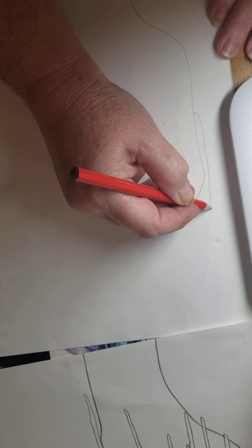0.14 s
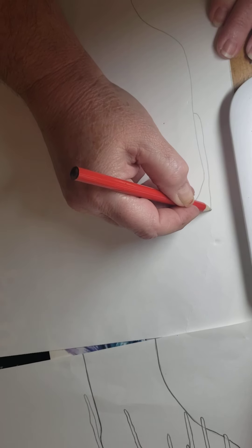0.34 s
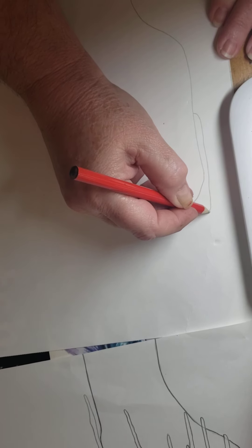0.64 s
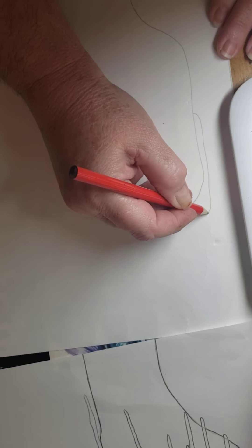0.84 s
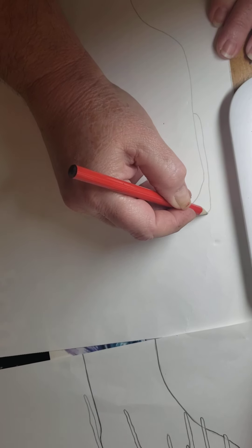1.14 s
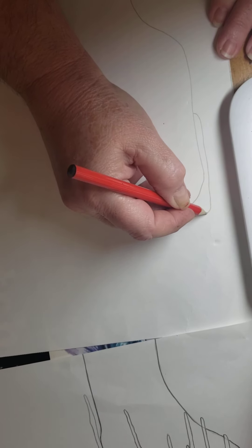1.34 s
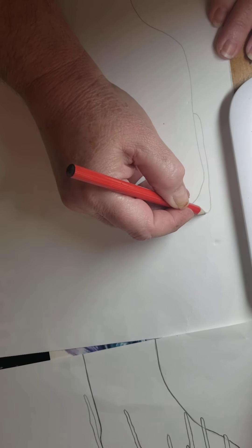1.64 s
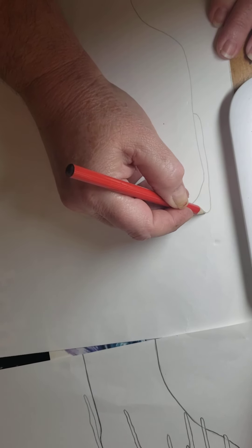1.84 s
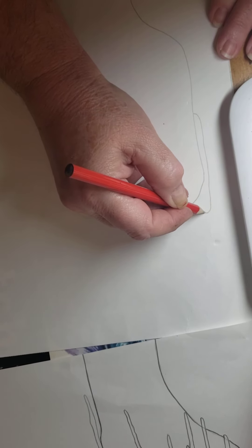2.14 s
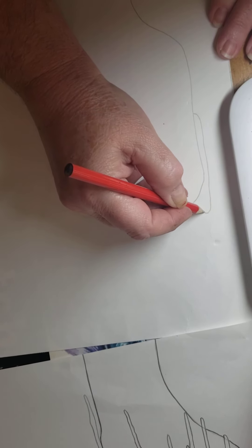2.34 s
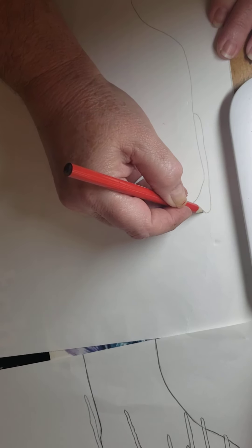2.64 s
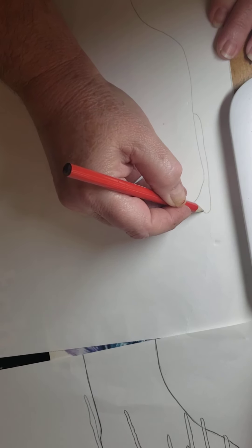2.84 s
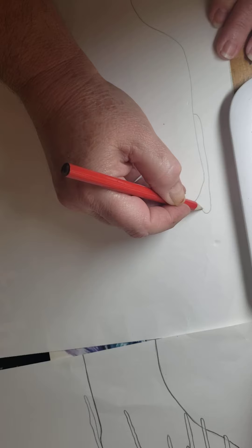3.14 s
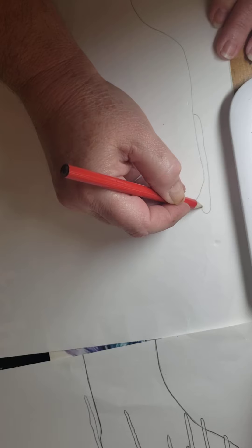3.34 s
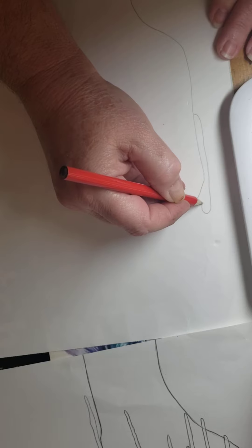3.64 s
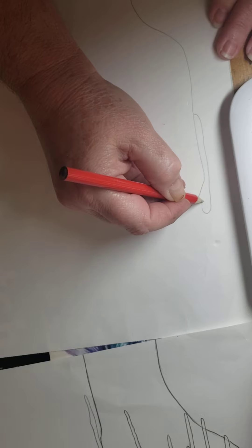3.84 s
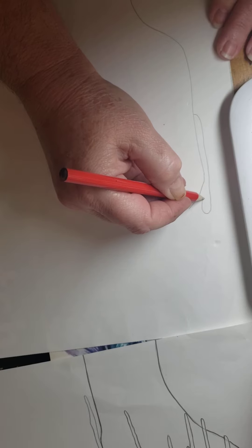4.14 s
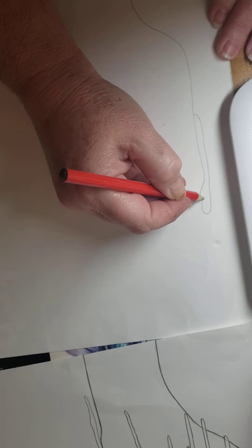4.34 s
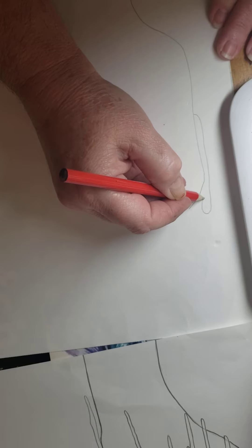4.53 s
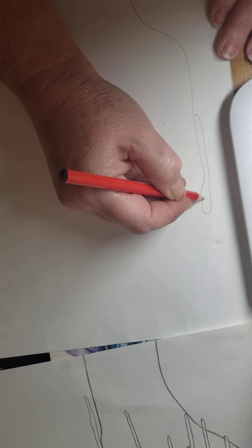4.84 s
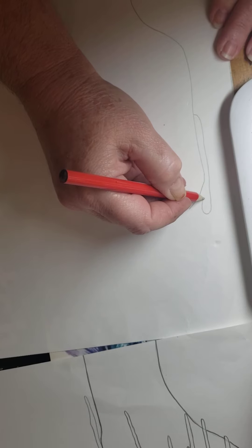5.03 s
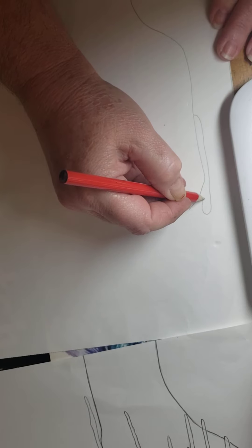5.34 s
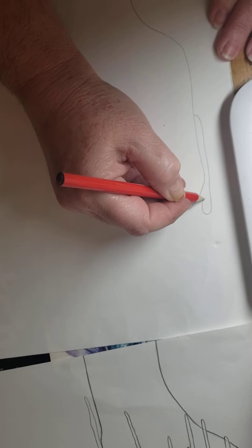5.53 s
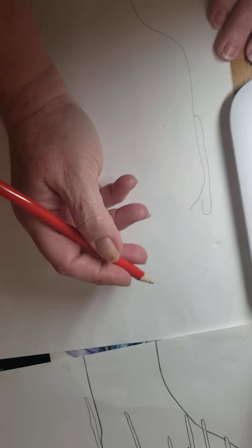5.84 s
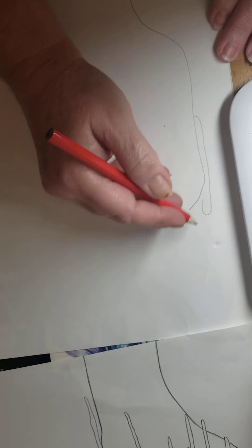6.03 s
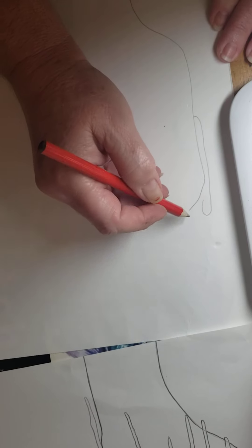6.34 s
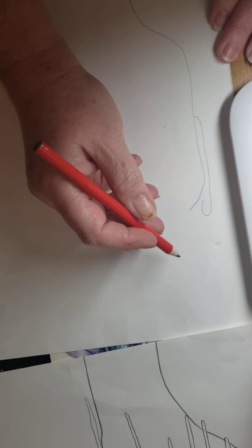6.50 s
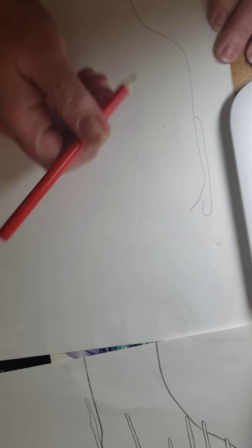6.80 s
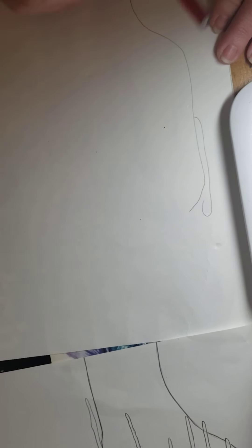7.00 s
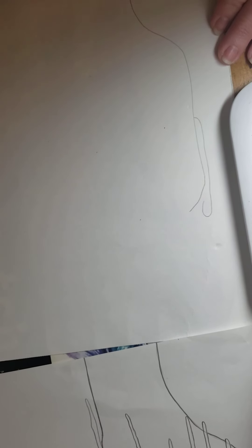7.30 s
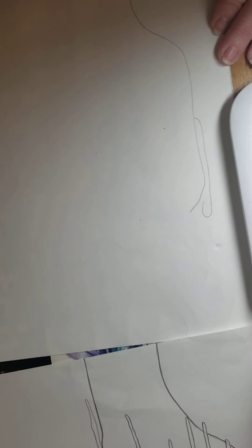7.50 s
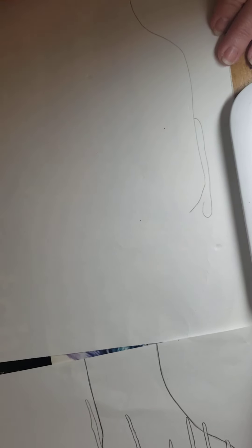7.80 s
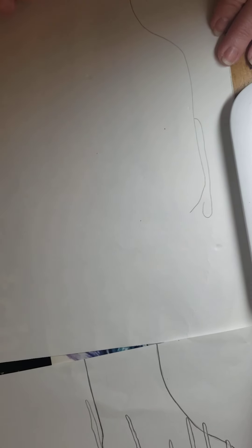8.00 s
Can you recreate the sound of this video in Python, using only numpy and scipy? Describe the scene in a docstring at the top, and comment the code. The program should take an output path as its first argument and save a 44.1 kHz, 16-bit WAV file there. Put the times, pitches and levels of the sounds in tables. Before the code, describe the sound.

A machine's low electrical hum fills a quiet indoor room, pulsing slowly at first and then faster. Beneath it lie low rumble, airy wash and faint microphone hiss. After about six seconds a hand brushes paper with two light swishes, the second stronger. Near the end a pencil touches the desk with a soft knock and small rattle, then one loud, dry, sharp click. Close stereo microphones.

```python
"""A machine hums throughout in a quiet room, over low rumble, airy wash and microphone hiss.
Its motor beats against the mains hum: the sound swells and fades, slowly at first, then faster.
After 6 s a hand slides twice over paper: two swishes of coloured noise.
At 7.5 s a pencil is laid on the desk: a soft knock, a short rattle, one sharp click and a faint bounce,
each blow a noise crack with ringing modes and a room tail, heard by two microphones a hand's width apart."""
import sys
import numpy as np
from scipy import signal
from scipy.fft import rfft, irfft
from scipy.io import wavfile

SR = 44100
rng = np.random.default_rng(int(sys.argv[2]) if len(sys.argv) > 2 else 0)


def dump(signal):
    """Clip the signal to [-1, 1] and save it as 16-bit WAV at the path in sys.argv[1]."""
    limited = np.clip(np.atleast_2d(signal).T, -1, 1)
    pcm = np.round(limited * 32767).astype(np.int16)
    wavfile.write(sys.argv[1], SR, pcm)


N = 359856
TIME, BINS = np.arange(N) / SR, np.fft.rfftfreq(N, 1 / SR)


def gain_of(db):
    """Decibels to an amplitude factor."""
    return 10 ** (np.asarray(db) / 20)


def evened(x):
    """Scales to an rms of one."""
    return x / np.sqrt(np.mean(abs(x) ** 2) + 1e-30)


def at_time(points):
    """Interpolates a two-column time table over the whole scene."""
    return np.interp(TIME, *np.transpose(points))


def read(points, hz):
    """Interpolates a frequency table on a log-frequency axis."""
    f, value = np.transpose(points)
    return np.interp(np.log(hz + 1), np.log(f + 1), value)


def panned(side_db):
    """Left and right gains for a left-minus-right level difference."""
    return gain_of(np.array([[.5], [-.5]]) * side_db)


def white():
    """The spectrum of fresh white noise."""
    return rfft(rng.standard_normal(N))


def drift(rate_hz):
    """Low-passed random fluctuation of unit rms."""
    return evened(irfft(white() * np.exp(-(BINS / rate_hz) ** 2), N))


def noise_pair(colour):
    """Coloured noise of unit rms, unrelated at the two microphones."""
    spectra = np.array([white(), white()]) * gain_of(read(colour, BINS))
    return evened(irfft(spectra, N))


def tone(turns, waver, waver_hz):
    """A partial of unit rms that follows a count of turns, wavering slowly in level and phase."""
    sway = evened(1 + waver * (drift(waver_hz) + 1j * drift(waver_hz)))
    return np.sqrt(2) * (sway * np.exp(2j * np.pi * turns)).real


MAINS_HZ = 60
# motor's lead over the mains, one swell per half turn gained: (time [s], lead [turns])
LEAD = [(0.0, 0.012), (1.22, 0.087), (1.81, 0.26), (2.3, 0.38), (2.65, 0.49), (3.43, 0.63), (3.54, 0.59),
        (3.9, 0.78), (4.16, 0.97), (4.7, 1.088), (5.35, 1.296), (5.5, 1.416), (5.72, 1.455), (6.5, 1.904),
        (7.38, 2.45), (7.73, 2.6), (8.16, 2.88)]
# electrical hum at twice the mains: (time [s], level [dB])
MAINS_LEVEL = [(0, -39), (1.8, -38.5), (2.6, -39.5), (4.3, -37.5), (5.25, -38.2), (6, -41.5), (7.4, -41.5),
               (8.16, -39.5)]
# motor's steady orders: (multiple of shaft speed, level [dB], waver [share], waver rate [Hz])
MOTOR_ORDERS = [(2, -37, .05, 4), (4, -60.5, .68, 2), (5, -66, .55, 2)]
# motor's odd orders: (time [s], first-order level before trim [dB], third-order level [dB])
ODD_LEVELS = [(0.0, -67, -52), (0.35, -49.7, -40.5), (1.05, -51, -49.5), (1.8, -52.7, -56), (2.4, -51, -46),
              (3.0, -51, -45.5), (3.95, -46.5, -47), (4.7, -49, -54), (5.8, -49, -48), (6.7, -48.9, -54),
              (7.5, -45, -58.5), (8.16, -52.5, -48.5)]


def hum(first_trim_db=-0.1, buzz_db=-65.5, side_db=0.8):
    """The motor gains on the mains; its second order beats against the hum at twice the mains."""
    mains_turns = MAINS_HZ * TIME
    shaft_turns = mains_turns + at_time(LEAD)

    electric = gain_of(at_time(MAINS_LEVEL)) * tone(2 * mains_turns, waver=.05, waver_hz=4.5)
    electric += gain_of(buzz_db) * tone(8 * mains_turns, waver=1.2, waver_hz=5)

    motor = np.zeros(N)
    for order, db, waver, waver_hz in MOTOR_ORDERS:
        motor += gain_of(db) * tone(order * shaft_turns, waver, waver_hz)
    s, first_db, third_db = np.transpose(ODD_LEVELS)
    first_gain = gain_of(np.interp(TIME, s, first_db) + first_trim_db)
    third_gain = gain_of(np.interp(TIME, s, third_db))
    motor += first_gain * tone(shaft_turns, waver=.12, waver_hz=5)
    motor += third_gain * tone(3 * shaft_turns, waver=0.21, waver_hz=3)
    # opposite signs: the two cancel most when in phase
    return (motor - electric) * panned(side_db)


# pencil's first soft touches: (time [s], blow gain [dB])
KNOCKS = [(7.536, -28.5), (7.5594, -33.5), (7.578, -38), (7.595, -40.5), (7.615, -43), (7.6238, -43)]
# hard wood snapping down, tip then shaft, and one bounce: (time [s], blow gain [dB])
CLICKS = [(7.64, -13.5), (7.6408, -10), (7.6662, -28.5)]
# relative colour of a soft blow: (frequency [Hz], density [dB per Hz])
SOFT = [(100, -15.5), (300, 1), (800, 1.5), (1400, -1.5), (2000, -12), (3500, -6), (4300, -20), (5000, -16),
        (7000, -29), (8800, -29), (16000, -42)]
# relative colour of a hard blow: (frequency [Hz], density [dB per Hz])
HARD = [(100, -25), (350, -9.5), (800, -5.5), (1700, -1.5), (2600, -1), (4000, -1.5), (5300, -0.5),
        (8500, -1.5), (9800, -9), (12000, -8.5), (13200, 0.5), (14300, -15), (16000, -16)]


def pencil():
    """The pencil touches down, rattles under the fingers and snaps flat on the desk."""
    out = np.zeros((2, N))
    for s, db in KNOCKS:
        knock = blow(SOFT, crack_s=0.0019, room_db=-10.5, ring_db=-5.0, side_db=3.5)
        add(out, s, gain_of(db) * knock)
    for s, db in CLICKS:
        click = blow(HARD, crack_s=0.0016, room_db=-14, ring_db=-6.0, side_db=5.0)
        add(out, s, gain_of(db) * click)
    return out


# ringing modes of pencil and desk: (frequency [Hz], relative level [dB], t60 [s])
WOOD = [(331, -19, 0.29), (505, -26, .3), (795, -20.5, .25), (986, -23, 0.28), (1269, -18, .2),
        (1417, -19.5, 0.17), (1498, -29.5, 0.16), (1840, -17, .17), (2190, -31, .17), (2724, -25.5, .12),
        (2896, -21.5, 0.16), (3600, -21.5, .1), (4400, -25.5, 0.1), (4781, -23.5, .15), (5240, -22.5, .14),
        (8300, -27.5, .1), (8840, -27, .15), (13100, -21, .1), (13200, -27.5, .12)]
# room decay: (frequency [Hz], t60 [s])
DECAY = [(250, 0.22), (1000, 0.35), (3000, 0.24), (8000, 0.17), (15000, 0.2)]


def blow(colour, crack_s, room_db, ring_db, side_db, after_side_db=3.2, tail_rise_s=0.0014):
    """One blow of wood on desk: a brief crack, decaying modes and the room's tail, coloured by contact."""
    t = np.arange(SR // 2) / SR
    crack = snap(t, crack_s) * panned(side_db)
    tail = room_tail(t) * (1 - np.exp(-t / tail_rise_s))
    ring = sum(gain_of(db - 60 * t / t60) * np.sin(2 * np.pi * f * t) for f, db, t60 in WOOD)
    after = gain_of(room_db) * tail + gain_of(ring_db) * ring
    dry_blow = crack + after * panned(after_side_db)
    return signal.fftconvolve(dry_blow, contact_filter(colour)[None], axes=1)


def snap(t, crack_s):
    """A whitened noise burst that dies at once."""
    z = rfft(rng.standard_normal((2, len(t))) * np.exp(-t / crack_s))
    burst = irfft(z / abs(z), len(t)) * np.exp(-(t / (4 * crack_s)) ** 2)
    return burst * np.sqrt(crack_s * SR / 2) / np.linalg.norm(burst, axis=1, keepdims=True)


def room_tail(t):
    """Diffuse reflections: noise whose decay time depends on frequency."""
    noise = rng.standard_normal((2, len(t)))
    hz, frame_s, z = signal.stft(noise, SR, nperseg=128)
    decay = gain_of(-60 * frame_s / read(DECAY, hz)[:, None])
    return signal.istft(z * decay, SR, nperseg=128)[1][:, :len(t)]


def contact_filter(colour, taps=2048):
    """Minimum-phase impulse response: colours a blow without smearing its onset."""
    hz = abs(np.fft.fftfreq(taps, 1 / SR))
    gain = evened(gain_of(read(colour, hz)))
    spectrum = np.exp(np.conj(signal.hilbert(np.log(gain))))
    return np.fft.ifft(spectrum).real[:taps // 2]


def add(mix, s, sound, lag_s=.0003):
    """Places a sound that reaches the right microphone a moment after the left."""
    for channel, source, start_s in zip(mix, sound, (s, s + lag_s)):
        part = channel[round(start_s * SR):][:len(source)]
        part += source[:len(part)]


# hand slides: (time of peak [s], length [s], peak level before grain [dB])
SLIDES = [(6.043, 0.13, -60), (6.74, 0.19, -52)]
# relative colour of skin on paper: (frequency [Hz], density [dB per Hz])
PAPER = [(300, -16.5), (2000, -7), (5000, -11), (8000, -7), (10000, -4.5), (12500, 0), (15700, -1.5)]


def hand(rest_db=-87.5, edge_db=-5, grain_db=1.1, grain_hz=90, side_db=1.5):
    """Skin brushing paper fibres: noise that swells and fades per slide, slightly uneven, over a faint rest."""
    level = gain_of(rest_db)
    for peak_s, length_s, db in SLIDES:
        # edge_db is reached half a length either side of the peak
        level = level + gain_of(db + edge_db * (2 * (TIME - peak_s) / length_s) ** 2)
    grain = gain_of(grain_db * drift(grain_hz))
    return level * grain * noise_pair(PAPER) * panned(side_db)


# room resonances stirred by the machine: (frequency [Hz], width [Hz], level [dB], left-right [dB])
ROOM_MODES = [(55.8, 12, -56, 7.5), (81, 12, -53, .3), (113.2, 6.5, -47.5, 1.6), (130, 16, -56, -0.2),
              (168.3, 5.9, -50, 1), (178.6, 7.3, -52, 1.8), (218.4, 9, -62.5, -2.5),
              (246.8, 16, -58.5, -1.5), (300.9, 8, -59.5, -5), (321, 15.4, -59, -3), (352.4, 12, -65, 14.5),
              (376.7, 6.9, -65.5, -6), (413, 9, -65.5, -3.5), (489, 33, -65.5, -5), (601.4, 32, -63, 3.5),
              (672, 23, -63, 6), (716.6, 12, -62, 3.5), (842, 27, -69.5, 9.5), (2380, 200, -75, 0.5),
              (3960, 240, -76.5, 7)]


def rumble(apart_hz=520):
    """Noise in the room's resonances; long waves reach both microphones alike."""
    out = np.zeros((2, N))
    for hz, width_hz, db, side_db in ROOM_MODES:
        shape = 1 / (1 + ((BINS - hz) / (0.89 * width_hz)) ** 2)
        same = np.exp(-(hz / apart_hz) ** 4)
        left = white()
        right = same * left + np.sqrt(1 - same ** 2) * white()
        pair = np.array([left, right]) * shape
        out += gain_of(db) * evened(irfft(pair, N)) * panned(side_db)
    return out


# relative colour of the room's airy wash: (frequency [Hz], density [dB per Hz])
AIR = [(20, -15), (45, 2.5), (140, 3), (200, -3), (450, 1), (1000, 0.5), (1600, -3.5), (2700, -11.5),
       (3300, -17.5), (4400, -22), (5400, -23), (7500, -29), (8600, -38), (16000, -61.5)]
# level balance of the wash: (frequency [Hz], left-right [dB])
AIR_SIDE = [(200, 3), (500, 1.5), (850, 5), (1300, 0.5), (2200, 9.5), (4400, 6), (6000, 16.5), (7500, 19),
            (9000, 4.5)]


def air(level_db=-51, flutter_db=0.49, flutter_hz=15.0, same=0.36, bass_same=1.0, bass_hz=260,
        lead_s=0.0004, ripple_db=1.1, ripple_decay_s=0.033):
    """Airy wash, near steady: its bass is alike in both microphones, the rest reaches the left first."""
    bass = np.exp(-(BINS / bass_hz) ** 2)
    likeness = np.clip(same + (bass_same - same) * bass, 0, 1)
    left = white()
    delay = np.exp(-2j * np.pi * BINS * lead_s * (1 - bass))
    right = likeness * left * delay + np.sqrt(1 - likeness ** 2) * white()

    # reflections from desk and walls leave a fixed ripple in the spectrum
    echoes = rng.standard_normal((2, N)) * np.exp(-TIME / ripple_decay_s)
    ripple = ripple_db * evened(rfft(echoes).real) * (1 - bass)
    colour = gain_of(read(AIR, BINS) + ripple) * panned(read(AIR_SIDE, BINS))
    wash = evened(irfft(np.array([left, right]) * colour, N))
    return gain_of(level_db + flutter_db * drift(flutter_hz)) * wash


# relative colour of microphone hiss: (frequency [Hz], density [dB per Hz])
HISS = [(100, -5), (9500, -4.5), (11500, 0), (16000, -2)]


def hiss(level_db=-73):
    """The microphones' own noise, independent per channel."""
    return gain_of(level_db) * noise_pair(HISS)


def scene():
    """Hum and room tone under the small sounds at the desk."""
    return hum() + pencil() + hand() + rumble() + air() + hiss()


def record(dry, edge_hz=15800):
    """Full-scale clip, then a linear-phase low-pass."""
    lowpass = signal.firwin(511, edge_hz, window=("kaiser", 9), fs=SR)
    return signal.oaconvolve(np.clip(dry, -1, 1), lowpass[None], "same")


dry = scene()
out = record(dry)
dump(out)
```